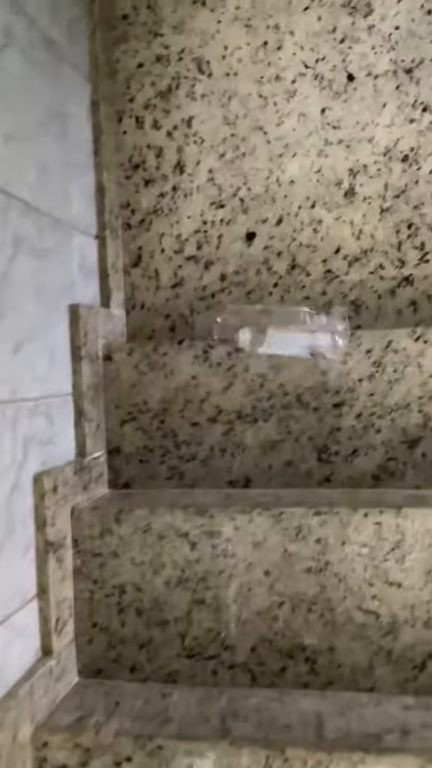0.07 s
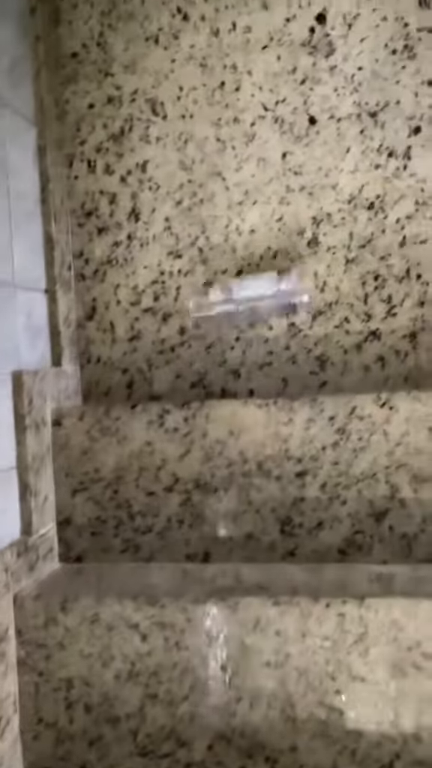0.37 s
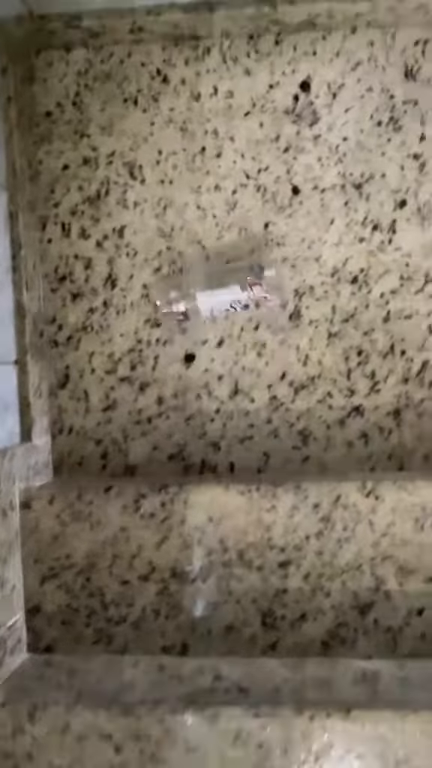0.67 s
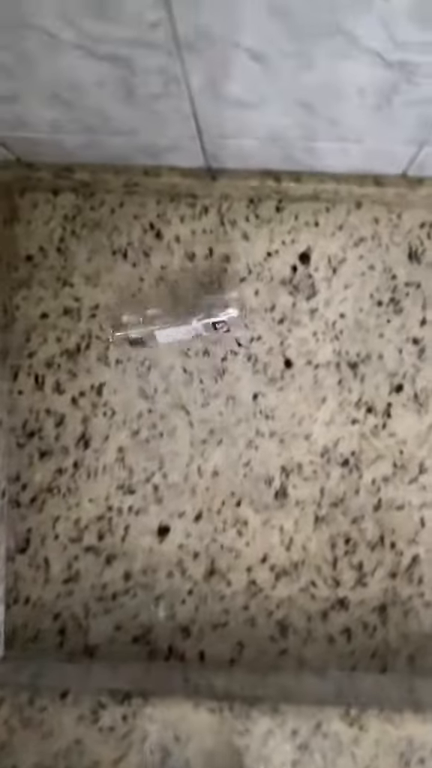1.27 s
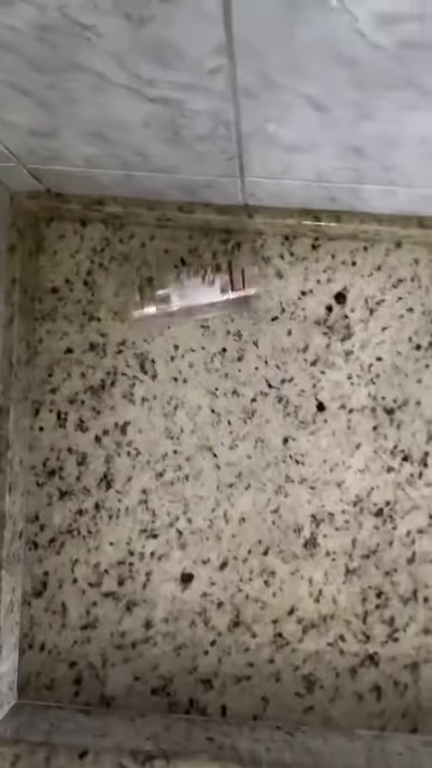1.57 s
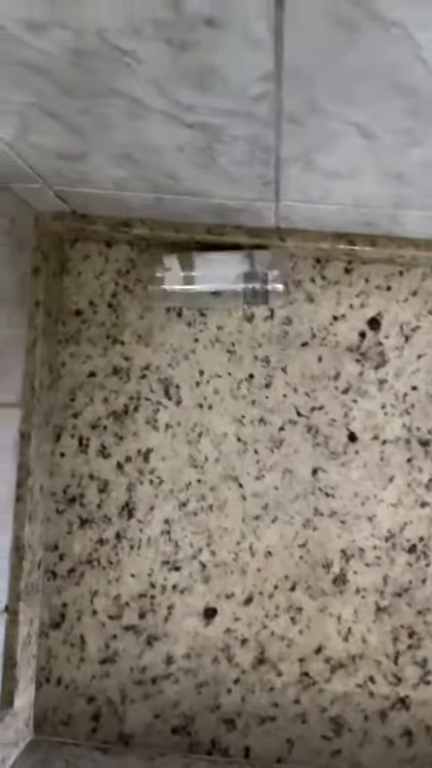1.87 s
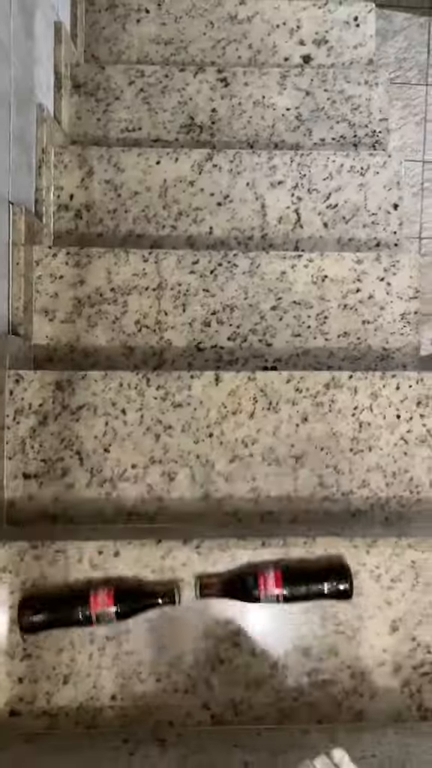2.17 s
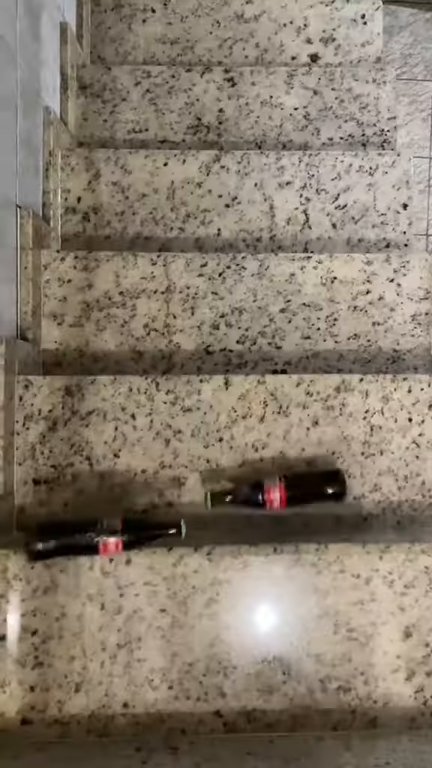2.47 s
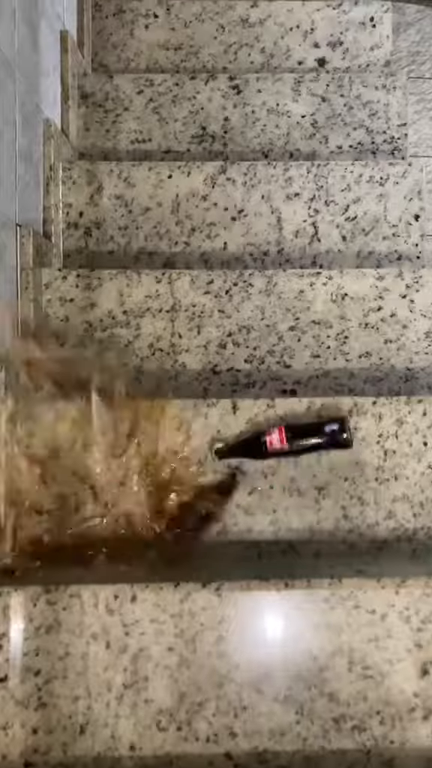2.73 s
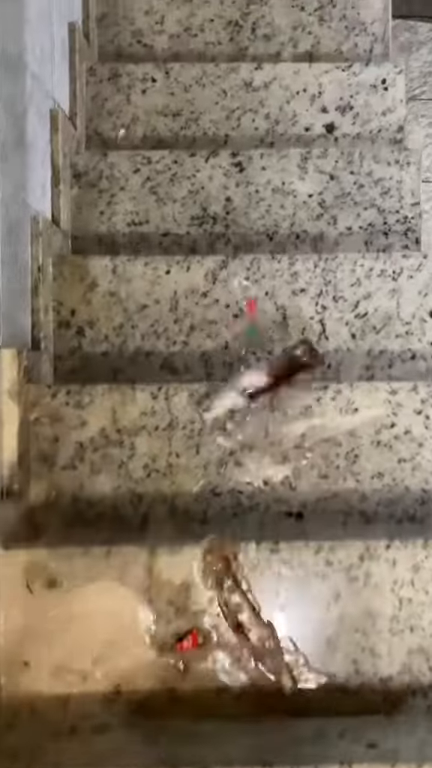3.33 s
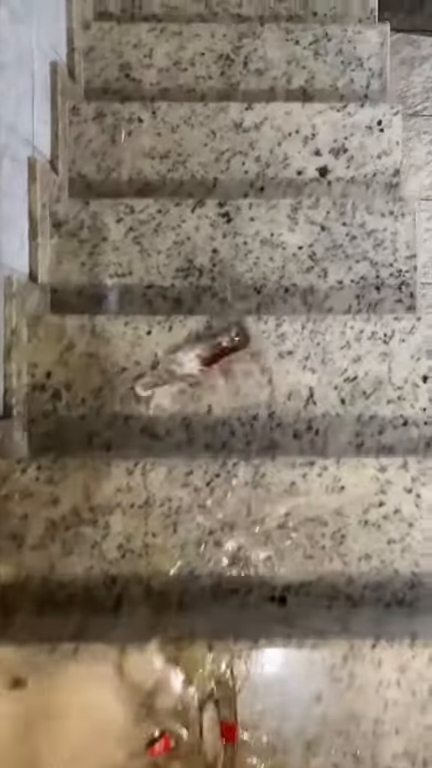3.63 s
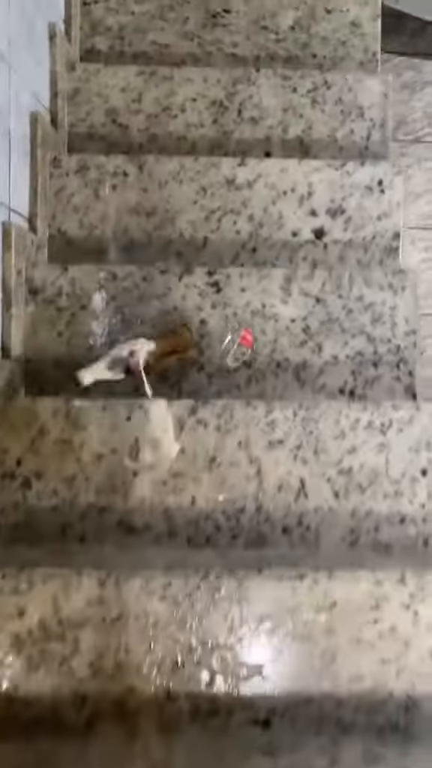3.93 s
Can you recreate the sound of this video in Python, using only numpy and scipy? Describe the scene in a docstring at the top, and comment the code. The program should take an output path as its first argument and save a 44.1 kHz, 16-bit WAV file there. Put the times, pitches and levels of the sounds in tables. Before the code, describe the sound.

Glass bottles tumble in an echoing stone stairwell. An empty one drops and rolls with faint ticks and thuds. Two full ones rattle, one bursts with a boom and foams, and the other knocks downward among clinking shards.

```python
"""Glass bottles in a tiled stone stairwell, where the hard walls echo every sound.
First an empty bottle drops onto the landing and rolls on, ticking, among soft thuds.
At about 2 seconds two full ones rattle over a step. Just after, one bursts with a boom and foams.
To the end, the other knocks down the stairs while shards clink and a broken piece rings."""
import sys
import numpy as np
from scipy import signal
from scipy.fft import rfft, irfft, next_fast_len
from scipy.io import wavfile
from scipy.ndimage import uniform_filter1d, map_coordinates

SR = 44100
rng = np.random.default_rng(int(sys.argv[2]) if len(sys.argv) > 2 else 0)


def dump_mix(stems):
    """Bounce the given channels to the path in sys.argv[1] as a 16-bit WAV at rate SR."""
    frames = np.atleast_2d(stems).T  # one column per channel
    limited = np.clip(frames, -1, 1)  # hard clip at full scale
    pcm = np.round(limited * 32767).astype(np.int16)
    wavfile.write(sys.argv[1], SR, pcm)


N = 176400
T = np.arange(SR) / SR

# A "colour" says how strong the low and high sounds are. A "t60" is the time to fade by 60 dB.
# The colour of cracking glass. Each row: frequency in Hz, level in dB.
CRACK_COLOUR = [(300, -36), (2000, 3), (5500, 5.5), (7000, -2.5), (9000, 6.5), (11500, 1.5), (13000, -10),
                (16000, -13)]
# Stereo width. Each row: frequency in Hz, strength of the sides compared with the middle.
WIDTH = [(60, 0.067), (250, 0.88), (2000, 0.91), (8000, 0.61), (12000, 0.72)]


def amp(db):
    """Turn decibels into a number to multiply by."""
    return 10 ** (np.asarray(db) / 20)


def along(points, hz):
    """Read between the rows of a frequency table, with octaves evenly spaced."""
    freqs, values = np.transpose(points)
    return np.interp(np.log(hz + 1), np.log(freqs + 1), values)


def fade(t, t60):
    """Die away by 60 dB every t60 seconds."""
    return np.exp(-np.log(1000) * t / t60)


def sized(x, db):
    """Give a sound the energy of 10 ms at this level."""
    return x * amp(db) * np.sqrt(SR / 100 / (np.sum(x * x) + 1e-20))


def add(track, s, x):
    """Mix x into the track, starting at s seconds."""
    part = track[round(s * SR):][:len(x)]
    part += x[:len(part)]


def filtered(x, gain):
    """Turn each frequency up or down without delaying it."""
    padded = next_fast_len(N + 8192)
    return irfft(rfft(x, padded) * gain(np.fft.rfftfreq(padded, 1 / SR)), padded)[..., :N]


def wobble(rate, shape):
    """Smooth curves that pass through `rate` random values a second."""
    at = np.arange(shape[-1]) * rate / SR
    rows = [map_coordinates(rng.standard_normal(int(at[-1]) + 4), [at]) for _ in range(shape[0])]
    return np.array(rows)


def noise(colour):
    """Stereo noise of a given colour, with its bass near the middle."""
    def gain(hz):
        return amp(along(colour, hz)) * np.array([np.ones_like(hz), along(WIDTH, hz)])
    mid, side = filtered(rng.standard_normal((2, N)), gain)
    return np.array([mid + side, mid - side]) / np.hypot(mid.std(), side.std())


def contact(colour, db, t60, tilt_db=0, rise_s=0.00089, lumps_db=0, size=8192):
    """A short gritty push. Tilt brightens it; lumps are the chance resonances of the spot that is hit."""
    hz = np.fft.rfftfreq(size, 1 / SR)
    lump_places = np.linspace(np.log(300), np.log(16000), 30)
    lumps = np.interp(np.log(hz + 1), lump_places, rng.standard_normal(30))
    colour_db = along(colour, hz) + lumps_db * lumps + tilt_db * np.log2((hz + 300) / 2000)
    # Build a filter that rings only after the hit, never before it.
    cepstrum = irfft(np.log(amp(colour_db)))
    cepstrum[1:size // 2] *= 2
    cepstrum[size // 2 + 1:] = 0
    grit = rfft(rng.standard_normal(size) * fade(T[:size], t60) * (1 - np.exp(-T[:size] / rise_s)))
    grit /= np.sqrt(np.abs(uniform_filter1d(np.abs(grit) ** 2, size=100)) + 1e-12)  # even out its tone
    return sized(irfft(grit * np.exp(rfft(cepstrum)))[:size // 2], db)


def ring(modes, db, scatter_db=2, detune=0.0034, rise_s=0.0033, rough=0, size=22050):
    """An object's own notes (modes), struck differently each time. They waver, as when glass turns."""
    spin_hz, spin_depth = 30, 0.55
    hz, level, t60 = np.transpose(modes)[:, :, None]
    strength, offset, phase, speed = rng.standard_normal((4, len(modes), 1))
    t = T[:size]
    spin = 1 + spin_depth * np.sin(2 * np.pi * (spin_hz * speed * t + offset))
    chatter = rough * wobble(rate=220, shape=(len(modes), size)) if rough else 0
    tones = np.sin(2 * np.pi * (hz * (1 + detune * offset) * t + phase) + chatter)
    notes = amp(level + scatter_db * strength) * fade(t, t60) * spin * tones
    return sized(notes.sum(0) * (1 - np.exp(-t / rise_s)), db)


def clack(hz, db, t60):
    """A very short knock whose pitch starts high and sags."""
    overshoot, sag_s, rise_s = 0.91, 0.0014, 0.00027
    t = T[:SR // 10]
    cycles = hz * (t + overshoot * sag_s * (1 - np.exp(-t / sag_s)))
    return sized(np.sin(2 * np.pi * cycles) * fade(t, t60) * (1 - np.exp(-t / rise_s)), db)


def burst():
    """The glass snaps and the freed gas booms into the stairwell."""
    # The boom. Each row: frequency in Hz, level in dB.
    boom_colour = [(30, -55), (70, -8.5), (130, -13), (260, -2.5), (480, -2.5), (620, -8.5), (900, -21.5),
                   (2000, -31), (6000, -58)]
    # Notes of the air in the stairwell. Each row: pitch in Hz, level in dB, t60 in seconds.
    air_modes = [(173.2, -3, 1.0), (277, 0.5, 0.35), (343, -7, 0.53), (395, -2, 0.63), (458.5, 5, 0.49),
                 (518, 4, 0.48)]
    start_s = 2.6045
    x = np.zeros(N)
    add(x, start_s, contact(CRACK_COLOUR, db=-23, t60=0.012, tilt_db=-1.5))
    add(x, start_s, contact(boom_colour, db=-12, t60=0.039, rise_s=0.0023))
    add(x, start_s, ring(air_modes, db=-16.5, scatter_db=-1, size=SR))
    return x


def rattle():
    """Full bottles chatter over a step. Each hit is a knock, dulled by the drink, and a rough ring."""
    # The hits. Each row: start in seconds, knock level in dB, ring level in dB.
    hits = [(2.041, -19, -16), (2.078, -19.5, -17.5), (2.09, -26, -17), (2.113, -23.5, -34),
            (2.13, -28, -23), (2.161, -26, -28), (2.177, -28.5, -20.5), (2.198, -22.5, -23),
            (2.223, -26, -15), (2.236, -21.5, -21), (2.25, -31, -23), (2.272, -23, -41), (2.289, -28, -23),
            (2.325, -27.5, -23.5), (2.479, -27, -18), (2.492, -43, -18.5)]
    # The body of a knock. Each row: frequency in Hz, level in dB.
    colour = [(30, -14), (120, 3.5), (400, 0), (750, 2), (1100, 14.5), (1700, -12), (2800, -2.5), (4000, 2),
              (4700, -29), (9000, -19), (13000, -37)]
    # Notes of a full bottle. Each row: pitch in Hz, level in dB, t60 in seconds.
    glass_modes = [(3570, 0, 0.072), (3790, -6.5, 0.12), (3940, -3, 0.1), (5324, -5, 0.077),
                   (5950, -7, 0.04), (9800, -26, 0.037), (11130, -15, 0.036)]
    # One strong note shifts as the drink sloshes. Each row: time in seconds, pitch in Hz.
    slosh = [(2.04, 3594), (2.09, 3727), (2.13, 3697), (2.18, 3336), (2.225, 3348), (2.29, 3550),
             (2.325, 3418), (2.478, 3766)]
    # Notes that follow it. Each row: multiple of that pitch, level in dB, t60 in seconds.
    slosh_modes = [(0.999, -0.5, 0.14), (1.531, -4.5, .08)]
    graze_s, graze_db, rough = 2.026, -30, 0.65  # a light first touch on the step
    first_hz, fall_hz_per_s = 1177, 200  # the knocks get lower as the bottles roll
    x = np.zeros(N)
    add(x, graze_s, ring(glass_modes, graze_db, rise_s=0.023, rough=rough))
    add(x, graze_s, contact(colour, graze_db, t60=0.043, rise_s=0.025))
    for s, db, ring_db in hits:
        hz = first_hz - fall_hz_per_s * (s - hits[0][0])
        add(x, s, clack(hz, db - 3.5, t60=0.014))
        add(x, s, contact(colour, db - 1.5, t60=0.025, rise_s=0.0038))
        slosh_hz = np.interp(s, *np.transpose(slosh))
        modes = glass_modes + [(slosh_hz * ratio, level, t60) for ratio, level, t60 in slosh_modes]
        add(x, s, ring(modes, ring_db - 3.5, detune=0.005, rise_s=0.0012, rough=rough))
    return x


def knocks():
    """Heavy glass hits the stone steps. Brighter blows are higher, and each trails a short crunch."""
    # The blows. Each row: start in seconds, level in dB, tilt (brightness) in dB per octave.
    blows = [(2.477, -19, 3), (2.4911, -18.5, 7.5), (2.506, -31, -0.5), (2.587, -25.5, -1),
             (2.704, -32.5, 0.5), (2.733, -26, 1), (2.748, -28.5, 5), (2.998, -15.5, -2), (3.062, -20, 0.5),
             (3.11, -16.5, 1.5), (3.191, -29, -1), (3.263, -36.5, 6.5), (3.294, -44, -4.5),
             (3.463, -30.5, -1.5), (3.489, -17.5, -1.5), (3.535, -15.5, 3), (3.556, -22, -1),
             (3.602, -31, 0), (3.758, -25.5, 6.5), (3.948, -16.5, 0.5)]
    # Their grit and crunch. Each row: frequency in Hz, level in dB.
    colour = [(50, -36), (200, -14.5), (550, -18), (800, -10), (1150, 2), (1550, -2.5), (2400, 1),
              (3300, -5), (4600, -3), (6500, -22.5), (10000, -21.5), (15000, -45)]
    # The hollow sound of the last blow. Each row: pitch in Hz, level in dB, t60 in seconds.
    hollow_modes = [(714, 7, 0.026), (830, 19, 0.021)]
    base_hz, octaves_per_tilt = 1195, 0.094
    x = np.zeros(N)
    for s, db, tilt in blows:
        add(x, s, clack(base_hz * 2 ** (octaves_per_tilt * tilt), db - 2.5, t60=0.01))
        add(x, s, contact(colour, db - 5, t60=0.01, tilt_db=tilt, rise_s=0.0012))
        add(x, s, contact(colour, db - 3.5, t60=0.11, tilt_db=tilt, rise_s=0.019, lumps_db=4))
    add(x, blows[-1][0], ring(hollow_modes, db=-27.5))
    return x


def shards():
    """Splinters land, ring and shed tiny bits. One large piece tumbles, ringing the same set of notes."""
    # Splinters landing. Each row: start in seconds, level in dB, middle pitch in Hz.
    landings = [(2.28, -33, 9800), (2.619, -22, 10880), (2.839, -35.5, 8870), (2.892, -31, 9850),
                (2.912, -22, 10960), (2.924, -24.5, 8720), (2.94, -21, 9260), (2.963, -20.5, 9660),
                (3.058, -16, 12200), (3.128, -17, 7600), (3.133, -20.5, 10240), (3.153, -25.5, 8900),
                (3.189, -30.5, 9380), (3.417, -27.5, 10100), (3.439, -19, 10230), (3.489, -28.5, 7920),
                (3.606, -27, 10400), (3.651, -35.5, 10550), (3.739, -32, 12950), (3.757, -30.5, 8980),
                (3.9, -30.5, 7730)]
    # The large piece landing. Each row: start in seconds, level in dB.
    tumbles = [(2.925, -21), (2.955, -23.5), (3.338, -20), (3.438, -17), (3.458, -19.5), (3.739, -13),
               (3.761, -14.5), (3.799, -28), (3.864, -24.5), (3.895, -20.5), (3.972, -29)]
    # Its notes. Each row: pitch in Hz, level in dB, t60 in seconds.
    piece_modes = [(2675, -9.5, 0.37), (4096, -8, 0.17), (4180, -1, 0.078), (4594, -2.5, 0.28),
                   (4625, -3.5, 0.1), (7660, -15.5, 0.092), (8300, -14, 0.085), (10100, -9.5, 0.073),
                   (13300, -14, 0.043)]
    pitch_spread, splinter_t60, mean_delay_s = 0.035, 0.07, 0.03
    x = np.zeros(N)
    for s, db, hz in landings:
        pitches = hz * np.exp(pitch_spread * rng.standard_normal(20))
        modes = [(pitch, 0, splinter_t60) for pitch in pitches]
        add(x, s, ring(modes, db - 3.5, scatter_db=3, size=6000))
        add(x, s, contact(CRACK_COLOUR, db - 12, t60=0.11))
        for delay in rng.exponential(mean_delay_s, 3):  # three tiny bits
            add(x, s + delay, contact(CRACK_COLOUR, db - 15, t60=0.026, lumps_db=4, size=2048))
    for s, db in tumbles:
        add(x, s, ring(piece_modes, db - 5, detune=0.002, rise_s=0.0029, rough=0.55))
    return x


def empty_bottle():
    """An empty bottle lands with a hard crunch, then rolls with small hollow ticks."""
    # The landing. Each row: start in seconds, level in dB, t60 in seconds, tilt in dB per octave.
    drop = [(0.21, -21.5, 0.0058, 0.5), (0.2116, -27.5, 0.053, 0), (0.224, -23, 0.017, 6),
            (0.2283, -23.5, 0.027, 3)]
    # The rolling. Each row: start in seconds, level in dB, t60 in seconds.
    ticks = [(.732, -49.5, 0.032), (0.781, -51, 0.038), (.818, -44.5, 0.08), (.829, -52, 0.019),
             (.9, -48, 0.083), (1.034, -51.5, 0.035), (1.067, -52, 0.017), (1.091, -51.5, 0.012),
             (1.147, -46, 0.021), (1.4255, -51, 0.0074), (1.5454, -44, 0.038), (1.6684, -40.5, 0.04),
             (1.72, -50, 0.064), (1.9094, -51, 0.02)]
    # The colours of both. Each row: frequency in Hz, level in dB.
    drop_colour = [(100, -11), (400, 1), (750, 0.5), (1000, 3), (1400, 4.5), (2200, 1.5), (4500, 2),
                   (6200, 0.5), (7300, -9.5), (9000, -1.5), (12000, -8), (15500, -13)]
    tick_colour = [(100, -32), (650, 8), (1000, 1.5), (1800, 2), (3200, 4.5), (6000, 7), (7400, -5),
                   (9000, 5.5), (11500, -0.5), (15000, -8.5)]
    # The notes of both. Each row: pitch in Hz, level in dB, t60 in seconds.
    drop_modes = [(739, -0.5, 0.077), (1415, -3, 0.039), (3160, 2, 0.016), (4620, -1, 0.012)]
    hollow_modes = [(630, 4.5, 0.14), (744, 3, 0.26)]
    wall_bump_s, end_knock_s = 1.5, 1.5455  # it reaches the wall, then knocks against it
    x = np.zeros(N)
    for s, db, t60, tilt in drop:
        add(x, s, contact(drop_colour, db, t60, tilt))
    add(x, drop[0][0], ring(drop_modes, db=-25, rough=0.59))
    for s, db, t60 in ticks:
        add(x, s, contact(tick_colour, db, t60, rise_s=0.005, lumps_db=4))
        add(x, s, ring(hollow_modes, db - 11.5, detune=0.033))
    add(x, wall_bump_s, ring(hollow_modes, db=-50, rough=0.6))
    add(x, end_knock_s, clack(hz=1500, db=-44, t60=0.011))
    return x


def thuds():
    """Soft dull bumps on the stone, like footsteps."""
    # The bumps. Each row: start in seconds, level in dB.
    bumps = [(.711, -41), (.8, -45), (1.011, -51), (1.065, -46), (1.147, -50.5), (1.212, -47), (1.404, -47),
             (1.433, -45), (1.48, -56.5), (1.51, -64)]
    # Their dull colour. Each row: frequency in Hz, level in dB.
    colour = [(40, -17), (150, -3.5), (300, 3.5), (500, -2.5), (900, -10.5), (3000, -24.5)]
    x = np.zeros(N)
    for s, db in bumps:
        add(x, s, contact(colour, db, t60=0.085, rise_s=0.0096))
    return x


def foam():
    """Spilt drink splashes and foams: noise that swells after the burst."""
    # Its loudness. Each row: time in seconds, level in dB.
    levels = [(2.6, -47), (2.64, -31.5), (2.8, -37), (3.2, -32.5), (3.6, -41.5), (4, -39.5)]
    # Its colour. Each row: frequency in Hz, level in dB.
    colour = [(60, 3.5), (400, -3), (800, 2.5), (2000, 5), (4500, -1), (7000, -19), (11000, -22),
              (15000, -37)]
    db = np.interp(np.arange(N) / SR, *np.transpose(levels), left=-120)
    return amp(db) * noise(colour)


def stairwell(x, block=6300):
    """Hard walls send back dense echoes. Each short block of sound gets a fresh tail of fading noise."""
    # How long the echoes last. Each row: frequency in Hz, t60 in seconds.
    echo_t60 = [(100, 2.53), (400, 1.26), (1000, 0.55), (2800, 0.92), (5000, 0.76), (8000, 0.68),
                (12000, 0.61), (16000, 0.39)]
    wall_delay_s, build_s, tail_s, grain_db = 0.003, 0.0016, 1.3, 2
    out = np.zeros((2, N))
    hz, t, spectra = signal.stft(rng.standard_normal((2, N)), SR, nperseg=256)
    spectra[1] *= along(WIDTH, hz)[:, None]
    t = t[t < tail_s]
    shape = fade(t, along(echo_t60, hz)[:, None]) * (1 - np.exp(-(t + 0.00057) / build_s))
    for i in range(0, N, block):
        pick = rng.integers(spectra.shape[2] - len(t))
        mid, side = signal.istft(spectra[:, :, pick:pick + len(t)] * shape, SR, nperseg=256)[1]
        grain = amp(grain_db * wobble(rate=300, shape=(1, len(mid))))
        tail = grain * np.array([mid + side, mid - side]) / np.linalg.norm(grain * mid)
        for ear, echo in zip(out, signal.fftconvolve(x[None, i:i + block], tail, axes=1)):
            add(ear, i / SR + wall_delay_s, echo)
    return out


def background():
    """An earlier echo dies away over the quiet rumble of the building."""
    # The colours of both. Each row: frequency in Hz, level in dB.
    rumble_colour = [(20, -26), (58, 7), (130, -3), (400, -37), (1000, -11.5), (5000, -16.5), (15000, -54)]
    echo_colour = [(100, -2), (700, -4), (1200, -10.5), (3000, -0.5),
                   (6000, -5.5), (8000, -10.5), (15000, -25)]
    echo = amp(-46.5) * fade(np.arange(N) / SR, t60=0.87) * noise(echo_colour)
    return echo + amp(-58) * noise(rumble_colour)


def scene():
    """Each hit is heard directly and by way of the walls, over the foam and the background."""
    # Each pair: a sound, the level of its echo in dB.
    sources = [(empty_bottle(), -2), (thuds(), -4.5), (rattle(), -1),
               (knocks(), -5.5), (burst(), -6), (shards(), -5.5)]
    direct = sum(x for x, _ in sources)
    echoes = stairwell(sum(x * amp(echo_db) for x, echo_db in sources))
    return direct + echoes + foam() + background()


def record(dry):
    """The microphone hears more low notes on the left, rounds off peaks and loses the highest treble."""
    # The lean to the left. Each row: frequency in Hz, how much louder the left side is in dB.
    left_bias = [(50, 1.5), (110, 4.5), (200, 7), (380, 14.5), (700, 6.5), (1290, 4), (2380, 1), (4400, 0),
                 (15000, 0)]
    ceiling, top_hz = 0.85, 15800

    def balance(hz):
        sides = amp(along(left_bias, hz) * np.array([[0.5], [-0.5]]))
        return sides / sides.mean(0)
    x = filtered(dry, balance)
    rounded = x / (1 + (x / ceiling) ** 4) ** 0.25
    return filtered(rounded, lambda hz: 1 / (1 + (hz / top_hz) ** 90))


dry = scene()
out = record(dry)
dump_mix(out)
```